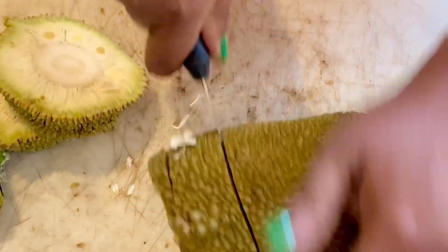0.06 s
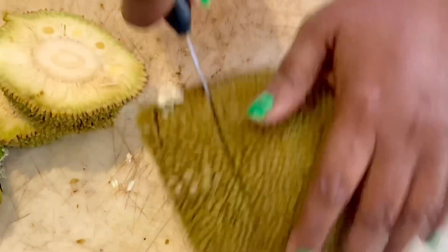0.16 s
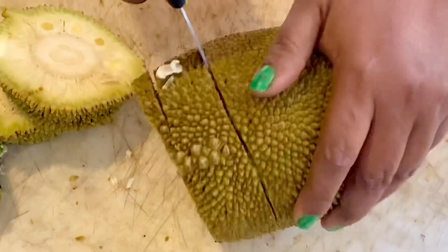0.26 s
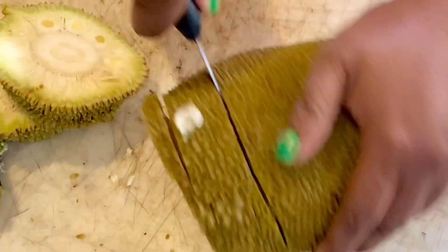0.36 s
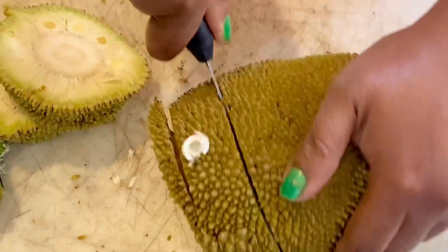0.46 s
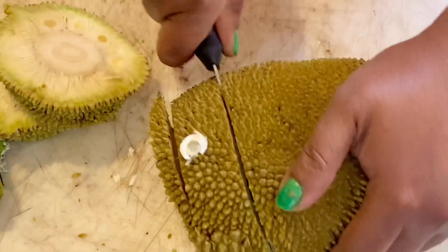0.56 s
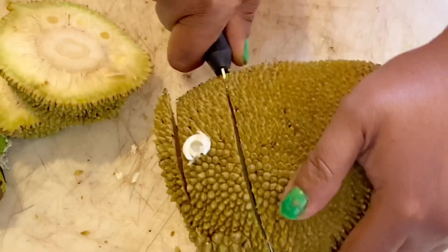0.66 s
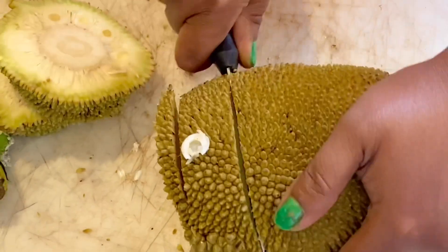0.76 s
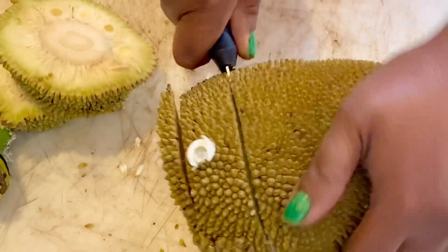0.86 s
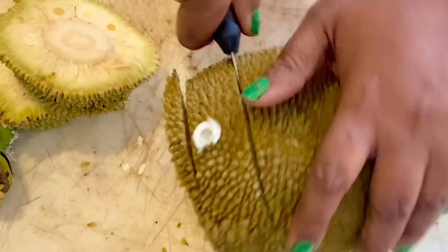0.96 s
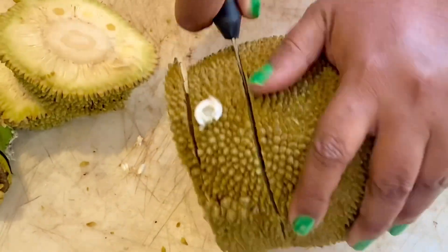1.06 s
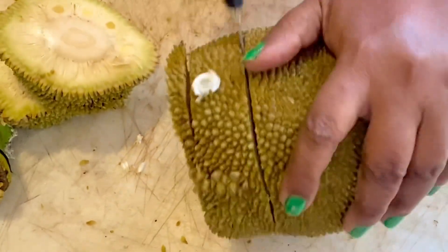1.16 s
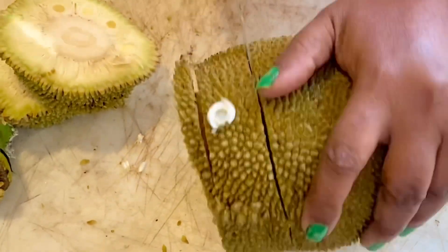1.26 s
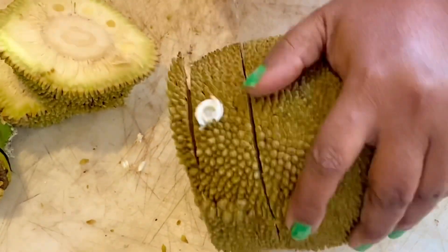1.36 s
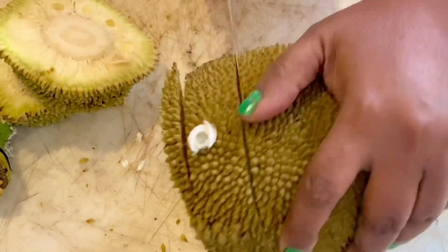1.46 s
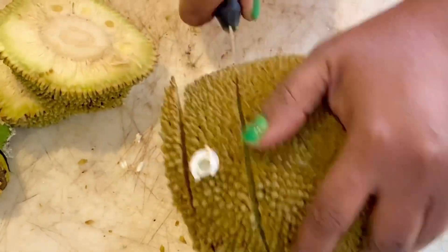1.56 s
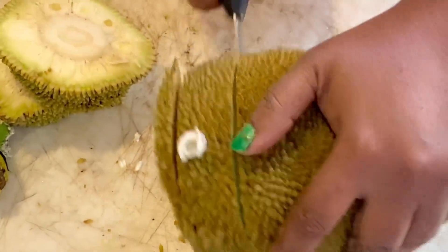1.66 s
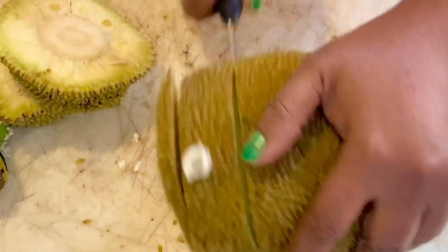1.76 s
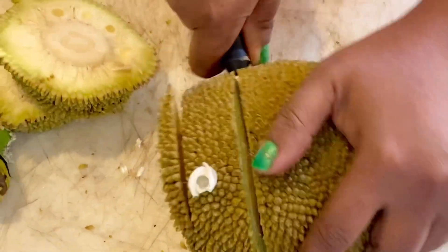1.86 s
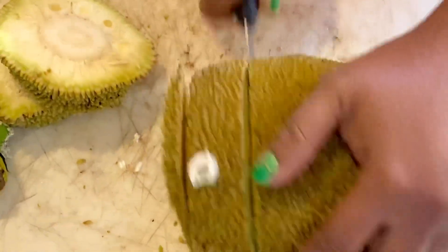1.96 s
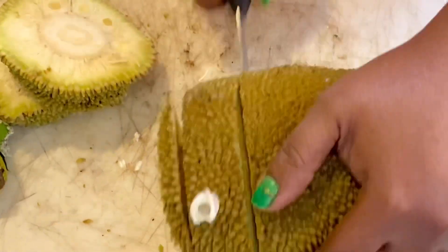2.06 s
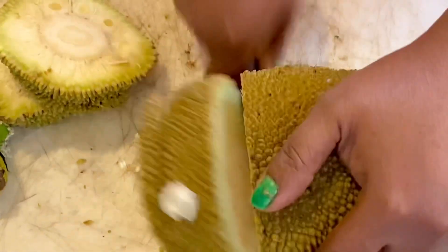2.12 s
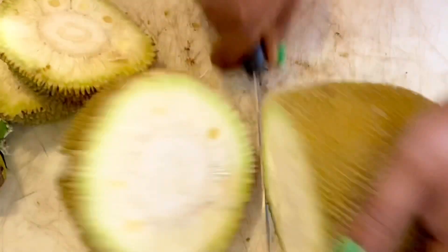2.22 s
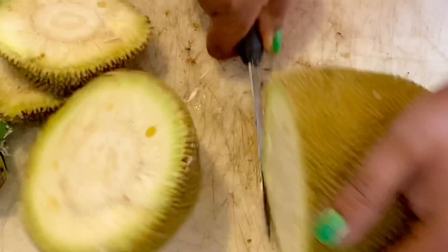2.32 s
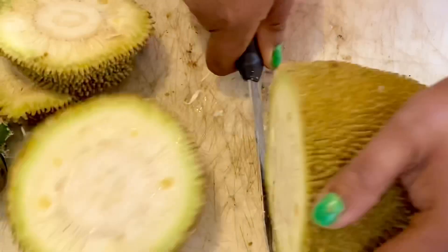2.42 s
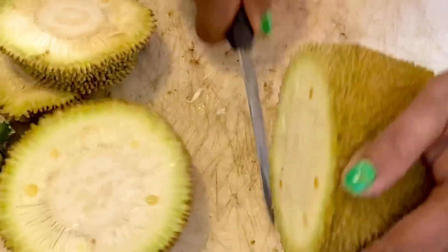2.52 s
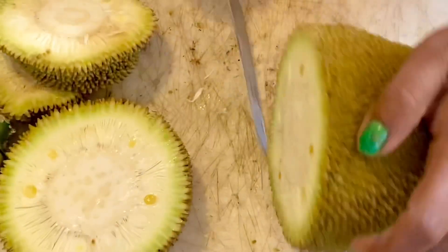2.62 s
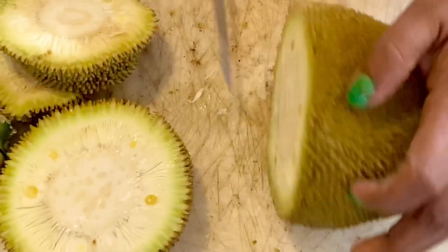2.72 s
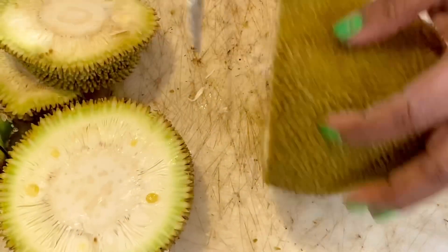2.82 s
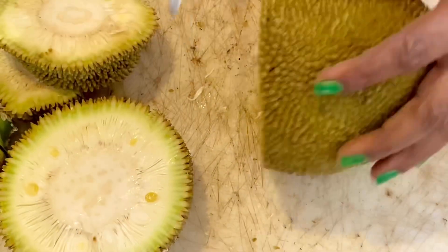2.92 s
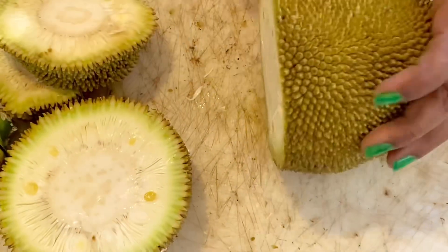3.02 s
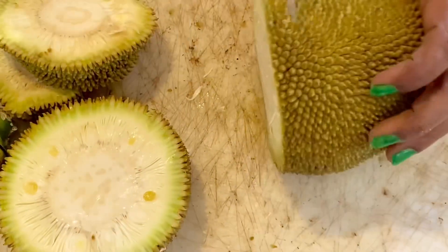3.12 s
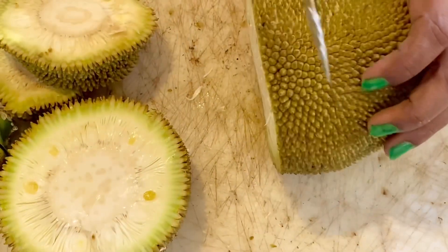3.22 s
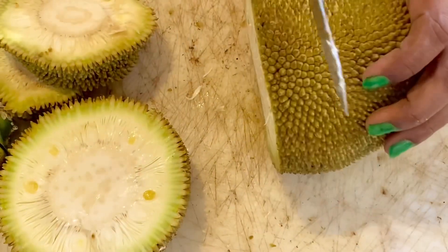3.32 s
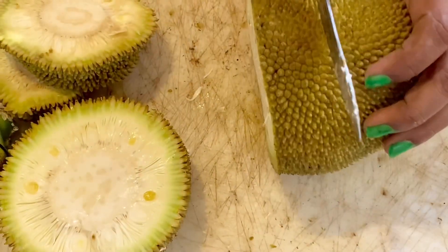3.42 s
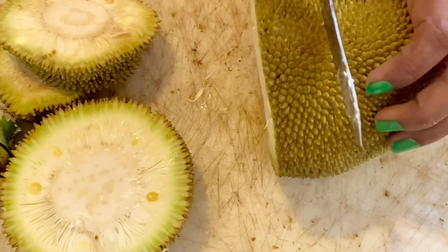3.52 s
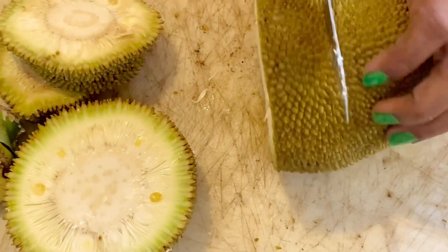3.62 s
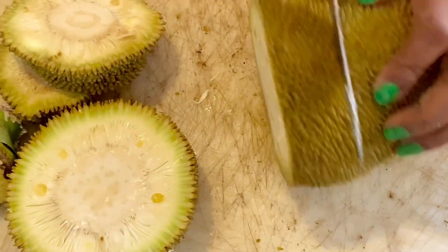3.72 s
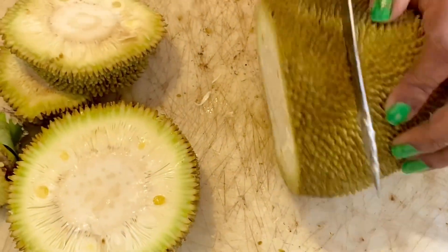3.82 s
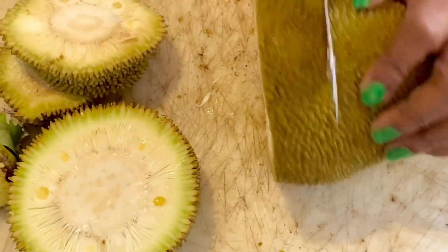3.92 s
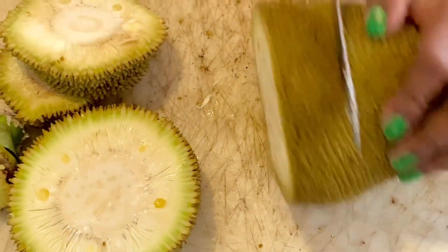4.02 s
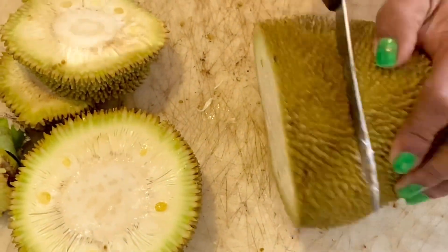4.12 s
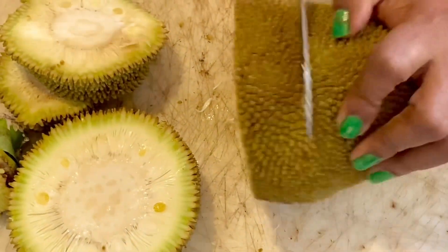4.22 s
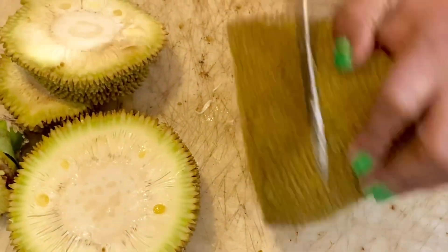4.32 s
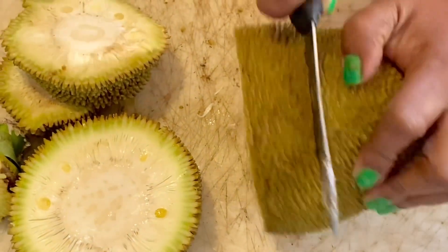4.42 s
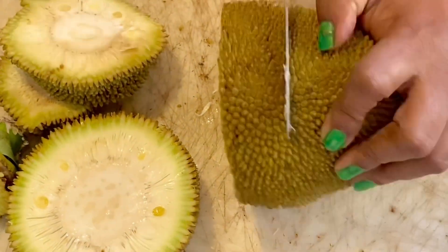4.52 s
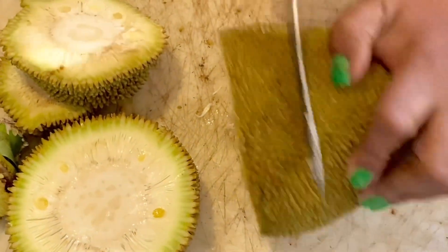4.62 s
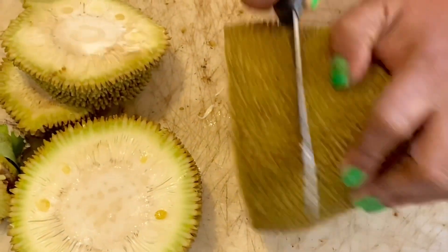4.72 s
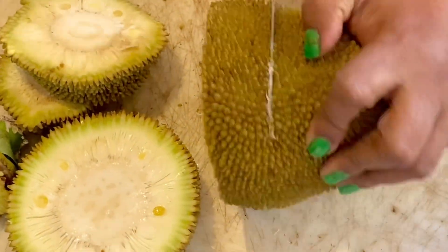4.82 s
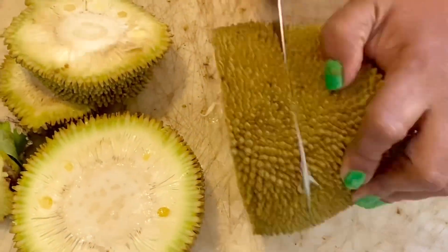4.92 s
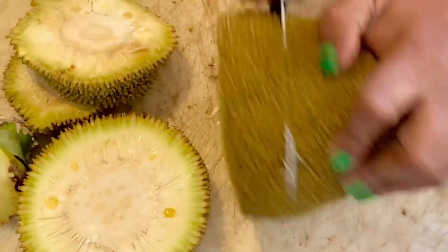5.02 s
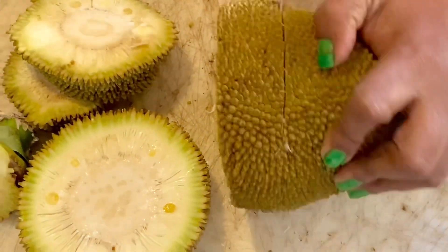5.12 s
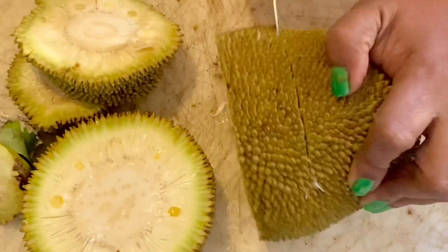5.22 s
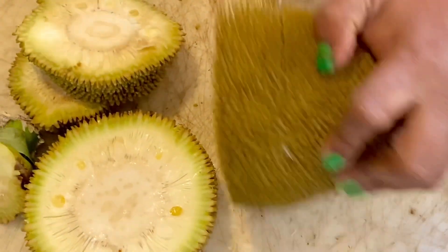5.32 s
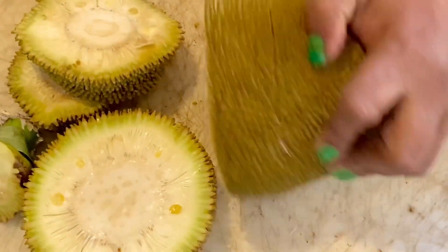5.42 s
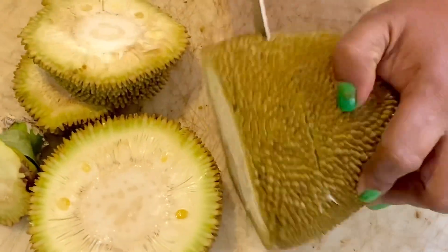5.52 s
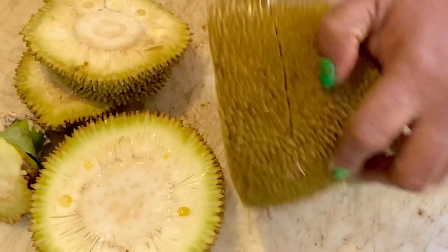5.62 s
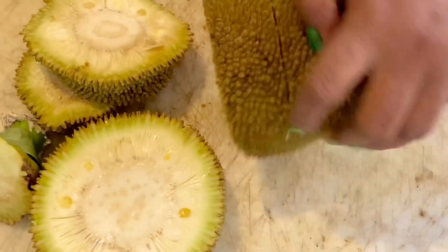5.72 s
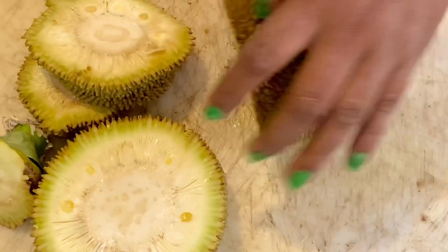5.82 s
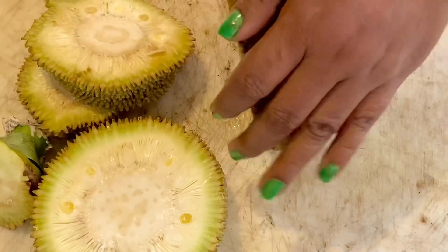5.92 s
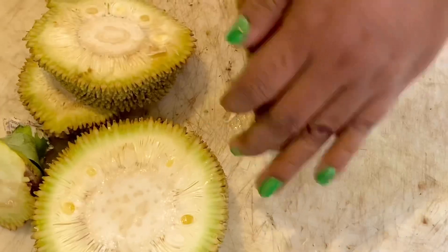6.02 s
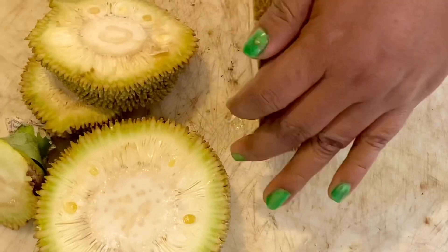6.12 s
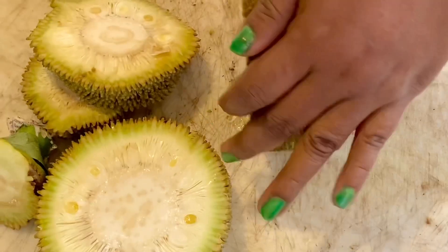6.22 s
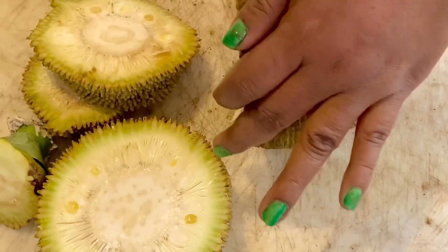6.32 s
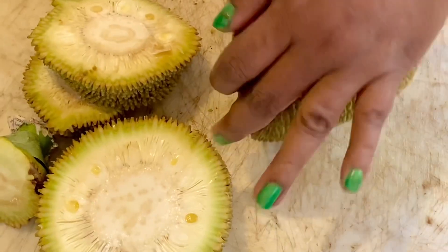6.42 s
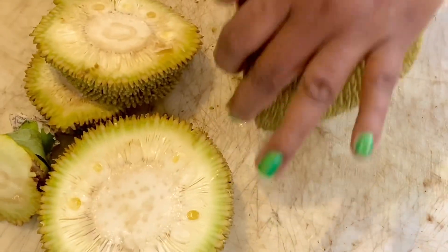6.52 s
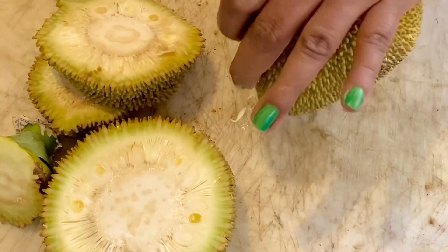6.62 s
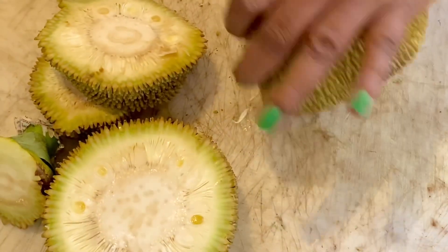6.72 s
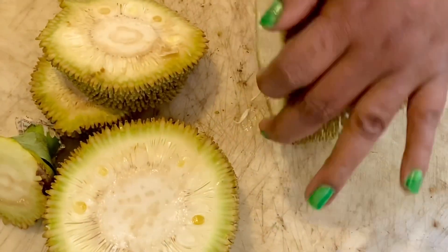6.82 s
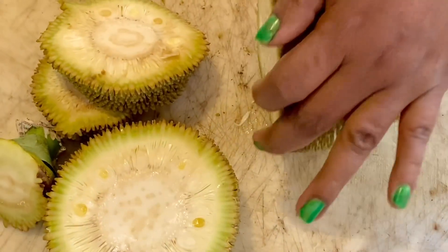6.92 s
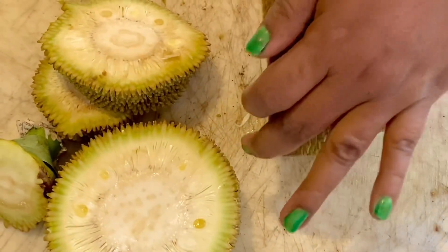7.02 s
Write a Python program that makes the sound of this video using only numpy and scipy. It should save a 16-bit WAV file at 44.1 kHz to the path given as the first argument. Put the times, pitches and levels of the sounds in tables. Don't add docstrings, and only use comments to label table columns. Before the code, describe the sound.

A phone held near a chopping board picks up gritty rind rubbing, blade ticks and crackling fibres. The knife bites deeper in crunchy bursts, then breaks through and cracks against the wood, its echo ringing briefly around the kitchen. The cut piece lands with low, muffled bumps. A lull follows, then regular short sawing rasps with little clicks and squeaky rubs, ending in scattered handling scuffs over quiet room air and hum.

```python
import sys
import numpy as np
from scipy import signal
from scipy.fft import rfft, irfft, next_fast_len
from scipy.io import wavfile
from scipy.ndimage import uniform_filter1d

SR = 44100
rng = np.random.default_rng(int(sys.argv[2]) if len(sys.argv) > 2 else 0)


def bounce(signal):
    frames = np.transpose(np.atleast_2d(signal))
    limited = np.clip(frames, -1, 1)
    pcm = np.round(limited * 32767).astype(np.int16)
    wavfile.write(sys.argv[1], SR, pcm)


def nominal_scale(level):
    x = np.asarray(level, float) / 20
    return 10 ** x


N = 311777
T = np.arange(N) / SR
BINS = next_fast_len(N, real=True)
F = np.arange(BINS // 2 + 1) * SR / BINS

# (full effort t/s, length/ms, tearing level/dB, blade contact level/dB)
TURNS = [(0, 110, -64, -9), (.109, 210, -60.5, -31), (.138, 90, -56.5, -45), (.33, 79, -55, -10),
         (.413, 150, -55, -10), (.455, 39, -74, -19), (.51, 89, -61.5, -2), (.6, 150, -80.5, 4),
         (.7, 104, -77, 1), (.81, 75, -67.5, -8), (.865, 60, -65.5, -5), (.9, 68, -64, -19),
         (1.162, 154, -61, -4), (2.33, 160, -74, -9), (2.46, 284, -69, -29), (2.617, 320, -71, -10),
         (2.8, 320, -73.5, -21), (2.85, 89, -68, -24.5), (3.11, 110, -78, -32), (6.25, 360, -83, -13),
         (5.612, 176, -57, -14.5), (5.692, 190, -63.5, -18), (6.007, 110, -53.5, -9), (6.114, 70, -71, -25),
         (6.463, 130, -69.5, -25), (6.536, 138, -66.5, -14.5), (6.704, 108, -56, -5),
         (6.765, 35, -59.5, -3.5), (6.985, 66, -60, -10), (7.055, 33, -61.5, -14)]
# (bite t/s, length/ms, tearing level/dB, blade contact level/dB)
PUSHES = [(1.367, 37, -62.5, -8.5), (1.408, 78, -54, -7.5), (1.44, 78, -55, -10.5), (1.6, 78, -67, -16.5),
          (1.706, 60, -58.5, -5), (1.732, 68, -48, -8), (1.879, 35, -53.5, -1.5), (1.905, 76, -53, 0),
          (2.012, 94, -50, -4), (2.06, 77, -39, -5.5), (3.017, 50, -73, -26)]
# (bite t/s, length/ms, tearing level/dB, blade contact level/dB)
SAWING = [(3.548, 55, -63, -7), (3.682, 63.9, -58, -6), (3.846, 88, -54, 0.5), (3.957, 39.7, -58.5, -12),
          (3.992, 64.9, -50.5, -1.5), (4.155, 77.8, -52, -2), (4.292, 86, -52.5, -3),
          (4.431, 89, -55, -0.5), (4.576, 86.6, -55, -3), (4.715, 96.5, -54, -5.5), (4.855, 70, -59, -4),
          (4.885, 50.34, -50, -5), (5.008, 80.5, -57, -4), (5.046, 59.7, -52, -8), (5.152, 80.5, -57, -4),
          (5.27, 94, -53, -21), (5.415, 81.4, -61, -14)]
# (f/Hz, level/dB per Hz)
TEAR = [(1200, -34), (2000, -1.5), (3000, -2.5), (5100, -6), (7000, -6.5), (8500, 1.5), (11000, -17)]
# (f/Hz, width/Hz, level/dB)
FRUIT = [(330, 490, -4.5), (870, 98, 0), (1116, 700, -5.5), (1530, 350, -5.5), (554, 46, -13.5)]
# (t/s, rise/ms, fall/ms, level/dB, f/Hz)
RASPS = [(0.14, 30, 40, -53, 830), (.405, 30, 30, -52, 2800), (.465, 15, 25, -56, 3150),
         (.312, 15, 12, -54, 1450), (.14, 30, 30, -60, 3100), (5.365, 8, 15, -56, 1500),
         (5.36, 12, 20, -52, 310), (.42, 16, 31, -52.5, 1680), (.525, 18, 23, -57, 1390),
         (3.05, 30, 40, -76, 4000), (3.85, 34, 23, -54.5, 1790), (4.18, 40, 24, -48.5, 856),
         (4.436, 4.5, 12, -46.5, 900), (5.313, 10, 10, -45, 908), (6.53, 66, 50, -66.5, 4600),
         (6.69, 53, 43, -56.5, 2580), (0.325, 10, 43, -48.5, 451), (5.366, 8.2, 17, -52, 804),
         (5.62, 110, 120, -59, 880), (4.75, 39, 31, -50.5, 940), (5.31, 30, 15, -52, 3000),
         (5.315, 10, 10, -52, 2300), (5.3, 30, 30, -61, 4900), (5.62, 50, 50, -63, 5100),
         (5.61, 30, 40, -63, 3900), (5.565, 15, 15, -58, 900), (5.64, 40, 30, -62, 1800),
         (5.44, 30, 30, -60, 890), (5.36, 11, 20, -55, 480), (3.025, 5.4, 20, -68, 3600),
         (3.12, 15, 20, -74, 5000), (6.71, 40, 40, -62, 4200), (5.06, 25, 30, -54, 1200),
         (4.6, 25, 35, -56, 1000), (4.9, 20, 25, -55, 1300), (1.44, 40, 50, -54, 480),
         (4.32, 25, 25, -55, 900), (3.88, 35, 35, -58, 7000), (3.88, 30, 35, -58.5, 5600),
         (1.45, 40, 40, -56.5, 5500), (4.455, 15, 14, -56, 5200), (4.02, 25, 20, -57, 4000),
         (6.981, 2.2, 8.4, -54.5, 1165), (7.049, 2.3, 8.7, -55.5, 1100)]
# (t/s, peak level/dB)
SNAPS = [(0.323, -30), (0.456, -45), (1.1062, -51), (1.2574, -55), (1.3703, -36), (1.409, -37),
         (1.7534, -35.5), (1.7713, -38.5), (1.8237, -50.5), (2.0198, -44.5), (2.0628, -21), (2.8555, -48),
         (3.0172, -61), (3.961, -41.5), (3.9977, -34), (4.4337, -43), (4.719, -43), (4.7335, -33.5),
         (5.0474, -37), (5.3003, -56.5), (5.365, -55), (5.9907, -35.5), (6.759, -37.5), (7.005, -57),
         (6.12, -59.5), (6.978, -37.5), (7.0484, -42)]
# (t/s, peak level/dB, treble level against it/dB)
TICKS = [(0.3798, -40.5, -9.5), (0.406, -36.5, -9.5), (0.496, -41, -12), (.5025, -38.5, -6),
         (0.52, -38, -10), (0.5994, -51, 7.5), (0.6593, -58, 0.5), (0.8643, -54, -6), (1.7082, -31.5, -8),
         (1.7254, -45, -1.5), (3.0975, -58, -30.5), (1.8585, -46.5, -6.5), (1.8803, -33, 11),
         (1.8926, -35, -10.5), (1.9188, -41.5, -2), (1.9516, -37.5, -4.5), (3.8223, -54, -2.5),
         (4.1567, -48, -11), (4.1848, -38.5, -9.5), (4.893, -40.5, -8.5), (5.255, -53, -6),
         (3.975, -47, -5.5), (6.6688, -47, -12), (6.3095, -61, 2.5), (6.8787, -55, -4)]
# (t/s, peak level/dB, f/Hz)
PINGS = [(0.8094, -56, 2050), (0.8644, -48, 2120), (0.9004, -52, 2790), (1.0334, -66, 2240),
         (1.0574, -65, 2040), (1.0924, -59, 2220), (1.1064, -47, 2970), (1.2604, -58, 2030),
         (1.2824, -63, 2000), (1.3824, -46, 2260), (1.4172, -40, 2190), (1.4674, -42, 2260),
         (2.0074, -45, 2710), (2.0153, -47, 2210), (2.0153, -39, 2040), (2.8294, -58, 2000),
         (2.8534, -49, 3260), (2.8974, -61, 2510), (2.9404, -65, 2430), (3.0165, -52, 3720),
         (3.0214, -59, 3200), (3.0284, -59, 3873), (3.0764, -58, 3220), (3.0854, -55, 3350),
         (3.0969, -47, 2957), (3.1144, -59, 2750), (3.3784, -63, 2220), (3.5553, -51, 5050),
         (3.6656, -52, 3140), (3.6915, -47, 2440), (3.8487, -43, 2510), (3.9619, -47, 3320),
         (4.0024, -38, 3620), (4.1624, -42, 2990), (4.2956, -45, 2060), (4.3031, -41, 2110),
         (4.578, -41, 2240), (4.5864, -38, 4650), (4.6962, -50, 3470), (4.8564, -46, 2170),
         (5.003, -49, 2100), (5.0549, -38, 2480), (5.1587, -43, 2550), (5.2779, -40, 3010),
         (5.3124, -38, 2430), (5.3544, -51, 2030), (5.3644, -53, 2060), (5.4161, -48, 3140),
         (5.6644, -44, 2520), (5.9569, -52, 2240), (6.6114, -60, 2190), (6.6553, -45, 2636)]
# (t/s, level/dB)
KNOCK = [
    (2.1050, -1.5),
    (2.1067, -2),
    (2.1081, -2.5),
    (2.1120, -4),
    (2.1176, -3.5),
]
# (f/Hz, level/dB, time to fall 60 dB/s)
BOARD = [(161, -18, 0.025), (297, -7, 0.028), (500, -6.5, 0.035), (666, -10, 0.023), (800, -10, 0.026),
         (950, -8, .035), (1140, -8.5, 0.05), (1410, -11, .05), (1856, -8.5, 0.045), (2205, -12.5, .07),
         (2340, -20, .15), (2420, -10.5, 0.07), (2970, -5.5, 0.028), (3220, -12, .045)]
# (f/Hz, level/dB)
BOARD_FAR = [(100, -18.5), (300, -2.5), (880, 0.5), (1500, 5), (2400, 8.5), (3500, -0.5), (4600, -10),
             (7000, -17.5), (10500, -26), (15000, -33)]
# (t/s, level/dB, contact time/ms)
DROPS = [
    (2.224, -41, 6.2),
    (2.376, -30, 1.35),
    (2.399, -29.5, 1.65),
    (2.42, -34, 2.9),
    (2.477, -30, 1.53),
    (2.495, -30, 2.8),
    (2.518, -36, 3.2),
    (2.536, -42, 3.2),
]
# (f/Hz, level/dB, time to fall 60 dB/s)
SLICE = [(86, 1.5, 0.054), (183, -0.5, 0.1), (318, -4.5, 0.058), (445, -21, .04), (630, -14.5, 0.048),
         (840, -6, 0.043)]
# (t/s, peak level/dB, f/Hz, time to fall
# 60 dB/s)
SHOVES = [(0.33, -38, 109, 0.18), (0.43, -32, 64, 0.048), (0.4, -32.5, 105, 0.27), (0.49, -39, 72, 0.079),
          (0.4, -41.5, 168, .06), (4.165, -43.5, 62, .08), (5.9, -40.5, 76, 0.075), (5.04, -42, 69, .1),
          (1.447, -40, 68, 0.37), (1.778, -27.5, 83, 0.086), (4.913, -28, 86, 0.11),
          (5.179, -43, 70.4, 0.24), (5.214, -39, 62, 0.13), (5.901, -45.5, 268, 0.039),
          (5.903, -55, 510, 0.031), (2.48, -47, 273, 0.065), (5.985, -41, 110, 0.25),
          (0.35, -37.5, 325, 0.018), (2.106, -34.5, 69, 0.15), (2.1055, -11, 878, 0.037),
          (1.8, -52.5, 199, 0.13), (2.253, -35, 105, 0.11), (2.30, -42, 70, .2), (5.45, -45, 310, 0.023),
          (2.3, -50, 270, 0.18), (4.902, -37, 255, 0.039), (0.37, -53, 460, 0.055)]
# (t/s, rumble level/dB)
LEAN = [(0, -64.5), (.44, -47.5), (.77, -59), (1.3, -59.5), (1.5, -55.5), (1.7, -52), (2.09, -45),
        (2.58, -52), (2.9, -64.5), (3.5, -56.5), (4.0, -54.5), (4.8, -52), (5.2, -51), (5.62, -54),
        (5.85, -63), (6.0, -43.5), (6.1, -59.5), (7.07, -53.5)]
# (f/Hz, time to fall 60 dB/s, level/dB, likeness of left and right 0-1)
WALLS = [(162, 0.19, -3, .85), (414, 0.32, 4, 0.75), (960, 0.75, -4.5, 0.55), (1810, 0.88, 1, 0.6),
         (2350, .8, -1, .8), (3220, .8, -2.5, .85), (5476, 0.87, 4, 0.5), (11000, .45, -6, 0.91)]
# (f/Hz, level/dB per Hz)
KITCHEN = [(18, -52), (30, -21), (48, 0), (70, -2), (91, -17), (123, -5), (311, -17.5), (413, -25),
           (458, -25.5), (871, -31), (1660, -29.5), (2840, -47), (11000, -78)]
# (f/Hz, level/dB, pitch spread as a share of f)
HUM = [(59.7, -56, 0.0042), (120.4, -60, 0.0059), (185.7, -71.5, 0.0068), (1655, -73.5, 0.004)]


def level(x, db):
    return x * nominal_scale(db) / np.sqrt(np.mean(x ** 2))


def over_hz(table):
    hz, value = np.transpose(table)
    return np.interp(np.log(F + 1), np.log(hz), value)


def shape(x, gain):
    return irfft(rfft(x, BINS) * gain, BINS)[..., :N]


def peak(hz, width):
    return 1 / (1 + 1j * (F - hz * hz / (F + 1)) / width)


def walk(rate):
    k = int(SR / rate)
    held = np.repeat(rng.standard_normal(N // k + 1), k)
    return 1.5 * uniform_filter1d(uniform_filter1d(held, k), k)[:N]


def ring(push, modes):
    out = 0
    for k, (hz, db, t60) in enumerate(modes):
        pole = np.exp(2j * np.pi * hz / SR - np.log(1000) / (t60 * SR))
        tone = signal.lfilter([1], [1, -pole], push + 1e-18).imag
        out = out + (-1) ** k * nominal_scale(db) * tone
    return out


def blows(rows):
    force = np.zeros(N)
    for s, db, ms in rows:
        bump = np.hanning(max(int(ms * SR / 1000), 1) + 2)
        force[int(s * SR):][:len(bump)] += nominal_scale(db) * bump / bump.sum()
    return force


def grit(spread_db, flicker_db):
    uneven = np.minimum(rng.exponential(size=N), 7.5)
    sizes = nominal_scale(spread_db * uneven + flicker_db * walk(120))
    return level(sizes * rng.standard_normal(N), 0)


def swell(t, s, rise_ms, fall_ms, bite=2.8):
    away = np.minimum(abs(t - s) * 1000 / np.where(t < s, rise_ms, fall_ms), 4)
    return -20 * away ** np.where(t < s, bite, 1.5 + 0.5 * bite)


def around(s):
    return slice(max(int((s - .3) * SR), 0), int((s + .3) * SR))


def add_strokes(power, rows, rising, after, body_db, bite):
    drag_db, drag_stretch = -17, 2.1
    for s, ms, db, blade_db in rows:
        span = around(s)
        rise_ms, fall_ms = rising * ms, (1 - rising) * ms
        full = s + after * rise_ms / 1000
        stroke_db = swell(T[span], full, rise_ms, fall_ms, bite)
        drag = drag_db + swell(T[span], full, drag_stretch * rise_ms, drag_stretch * fall_ms)
        effort_db = db + np.maximum(stroke_db, drag)
        parts_db = np.array([[0], [body_db - 0.091 * blade_db], [blade_db]])
        power[:, span] += nominal_scale(effort_db + parts_db) ** 2


def strokes():
    power = np.full((3, N), 1e-12)
    add_strokes(power, TURNS, rising=.48, after=0, body_db=0.99, bite=2.3)
    add_strokes(power, PUSHES, rising=0.55, after=0.83, body_db=0.8, bite=5)
    add_strokes(power, SAWING, rising=.38, after=0.77, body_db=1.72, bite=3.4)
    return np.sqrt(power)


def saw_fruit(tear_gain, body_gain, hiss_gain):
    tear = 0
    for hz in 1600 * 1.27 ** np.arange(8):
        colour = nominal_scale(over_hz(TEAR)) * peak(hz, .17 * hz)
        tear = tear + nominal_scale(2.8 * walk(45)) * shape(grit(3.2, 2.5), colour)
    body = 0
    for hz, width, db in FRUIT:
        body = body + nominal_scale(db + 2.5 * walk(30)) * shape(grit(3., 3.), peak(hz, width))
    hiss = shape(grit(2., 2.), peak(11200, 6000) ** 2)
    return tear_gain * level(tear, 0.52) + body_gain * level(body, 0) + hiss_gain * level(hiss, 1.)


def rasps():
    rub = grit(2., 2.5)
    out = np.zeros(N)
    for s, rise_ms, fall_ms, db, hz in RASPS:
        span = around(s)
        tone = signal.lfilter(*signal.iirpeak(hz, 15., fs=SR), rub[span])
        out[span] += nominal_scale(db + swell(T[span], s, rise_ms, fall_ms)) * level(tone, 0)
    return out


def snaps():
    low, high = np.zeros(N), np.zeros(N)
    t = np.arange(400) / SR
    snap_treble_db = -16.5
    rows = [(s, db, snap_treble_db) for s, db in SNAPS] + TICKS
    for s, db, top_db in rows:
        crack = rng.standard_normal(len(t)) * np.exp(-t / 0.0011)
        span = slice(int(s * SR), int(s * SR) + len(t))
        low[span] += nominal_scale(db - 2.0) * crack
        high[span] += nominal_scale(db + top_db + 5.0) * crack
    return shape(low, peak(3100, 7000) + 0.75 * peak(970, 500)) + shape(high, peak(17000, 6000) ** 2)


def pings():
    tone, crack = np.zeros(N), np.zeros(N)
    t = np.arange(600) / SR
    cycles = 9
    for s, db, hz in PINGS:
        span = slice(int(s * SR), int(s * SR) + len(t))
        fade = np.exp(-np.log(1000) * t * hz / cycles)
        tone[span] += nominal_scale(db - 3) * fade * np.sin(2 * np.pi * hz * t)
        crack[span] += nominal_scale(db + 1.5) * np.exp(-t / .0008) * rng.standard_normal(len(t))
    return tone + shape(crack, peak(3600, 6500) ** 2)


def burst(after, tau, hz, width):
    return (after > 0) * np.exp(-after / tau) * shape(rng.standard_normal(N), peak(hz, width) ** 2)


def knock():
    start = KNOCK[0][0]
    after = np.clip(T - start, 0, None)
    force = blows([(s, db, .12) for s, db in KNOCK])
    modes = nominal_scale(-11.0) * ring(force, BOARD)
    wood = nominal_scale(-4) * burst(after, 0.013, 2200, 1800)
    splinter = nominal_scale(-9.5) * np.roll(burst(after, 0.0019, 7000, 2200), int(0.0013 * SR))
    edge = nominal_scale(-24) * burst(after, .002, 10800, 2500)
    radiated = shape(blows([(start, 14, .02)]), nominal_scale(over_hz(BOARD_FAR)))
    return modes + wood + splinter + edge, radiated


def counter(work):
    out = np.zeros(N)
    for k, (hz, db, t60) in enumerate(SLICE):
        late = [(s + 0.5 / hz - .002, drop_db, ms) for s, drop_db, ms in DROPS]
        out -= (-1) ** k * ring(blows(late), [(hz, db + 4.5, t60)])
    for s, db, hz, t60 in SHOVES:
        span = slice(int(s * SR), int(s * SR) + SR // 2)
        push = blows([(s, db + 8.5, 900 / hz)])[span]
        out[span] -= ring(push, [(hz, 0, t60)])
    lean = nominal_scale(np.interp(T, *np.transpose(LEAN)) + 3.0 * walk(10))
    rumble = level(shape(rng.standard_normal(N), peak(94, 58) + 0.2 * peak(80, 30)), -4.5)
    board = level(shape(grit(2.7, 2.3), peak(190, 310) ** 2), -3.5)
    rumble_gain = np.hypot(lean, nominal_scale(1.5) * work)
    board_gain = np.hypot(nominal_scale(-9.5) * lean, nominal_scale(-5) * work)
    return out + rumble_gain * rumble + board_gain * board


def walls(x):
    late = np.clip(T - .008, 0, None)
    scatter = shape(rng.standard_normal(N), peak(2100, 2200) ** 2 + .25 * peak(6000, 9000))
    mid, side = 0, nominal_scale(-24) * np.exp(-T / 0.004) * scatter
    for hz, t60, db, like in WALLS:
        noise = rng.standard_normal((2, N)) * (late > 0) * nominal_scale(-60 * late / t60)
        tails = nominal_scale(db - 5.5) * shape(noise, peak(hz, 1.3 * hz) ** 2) / np.sqrt(hz)
        mid = mid + np.sqrt(like) * tails[0]
        side = side + np.sqrt(1 - like) * shape(tails[1], peak(1500, 4000) ** 2)
    echo = np.array([mid + side, mid - side])[:, :SR]
    return signal.fftconvolve(x[None], echo)[:, :N]


def kitchen():
    colour = nominal_scale(over_hz(KITCHEN))
    side_share = 0.18 * peak(200, 2500) ** 2 + 0.81 * peak(1400, 1500) ** 4
    mid, side = shape(rng.standard_normal((2, N)), np.array([colour, colour * side_share]))
    air = (mid + side * np.array([[1], [-1]])) * nominal_scale(-55.5) / np.std(mid)
    hum = 0
    for hz, db, spread in HUM:
        loudness = nominal_scale(db + 1.5 + 2.4 * walk(6.6))
        turns = np.cumsum(hz * (1 + spread * walk(3.4))) / SR
        hum = hum + loudness * np.sin(2 * np.pi * turns)
    return air + hum


def gate(x, db, slope):
    power = uniform_filter1d(np.mean(np.atleast_2d(x) ** 2, axis=0), size=700)
    strength = np.sqrt(abs(power) + 1e-14)
    return np.minimum(strength / nominal_scale(db), 1) ** slope


def scene():
    blade, radiated = knock()
    effort = strokes()
    fruit = saw_fruit(*effort) + rasps() + snaps() + pings() + counter(effort[1])
    return fruit + blade + walls(nominal_scale(-7) * fruit + radiated) + kitchen()


def low_pass(x):
    return signal.sosfilt(signal.butter(12, 16460, fs=SR, output="sos"), x)


def record(dry):
    turn = np.pi * np.clip(F - 6850, 0, None) / 3480
    lead = (np.cos(turn) + .72j * np.sin(turn)) * (F < 15750)
    lean_db = 1.5 / 2 / (1 + (F / 2300) ** 6)
    left, right = shape(dry, np.array([lead.conj() * nominal_scale(-lean_db), lead * nominal_scale(lean_db)]))
    side = (left - right) / 2
    gap = shape(side, (F > 3650) & (F < 7100))
    side = side - gap * (1 - gate(gap, -52, 2))
    ports = (left + right) / 2 + side * np.array([[1], [-1]])
    top = shape(ports, F > 11800)
    ports = ports - top * (1 - gate(top, -92, 1.2))
    return low_pass(ports)


dry = scene()
out = record(dry)
bounce(out)
```